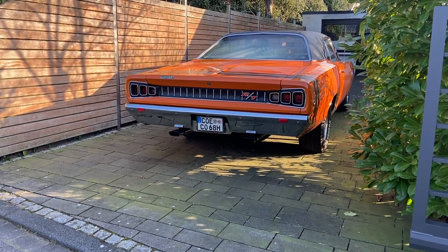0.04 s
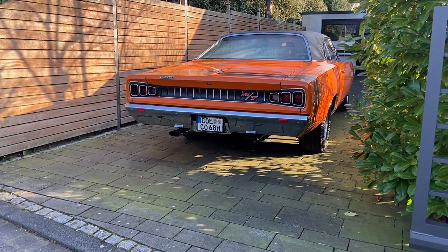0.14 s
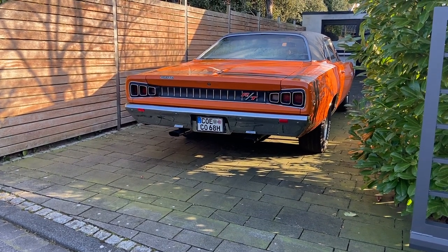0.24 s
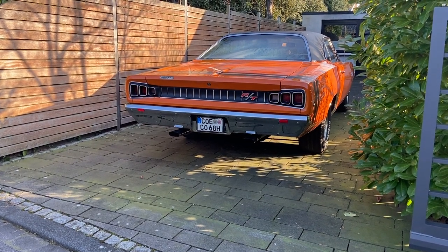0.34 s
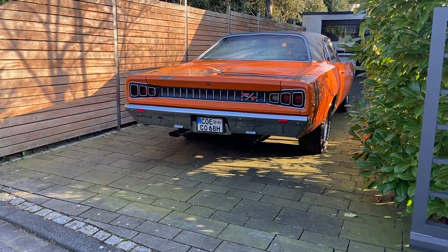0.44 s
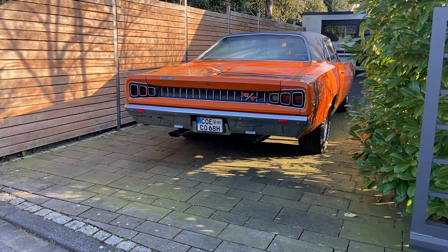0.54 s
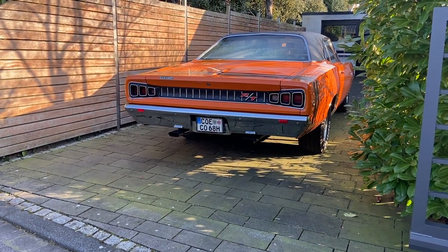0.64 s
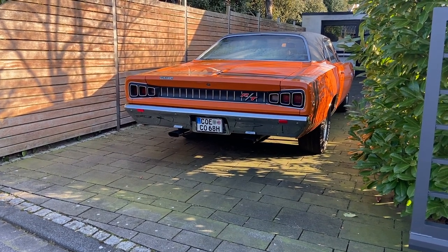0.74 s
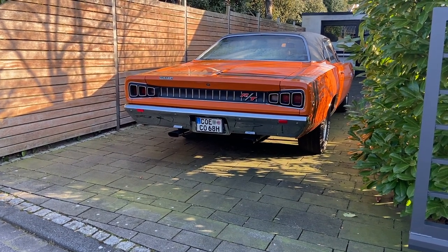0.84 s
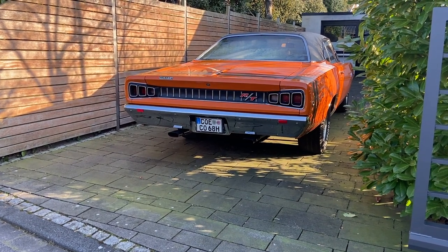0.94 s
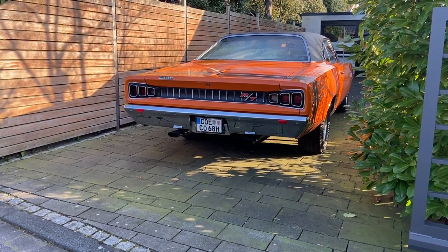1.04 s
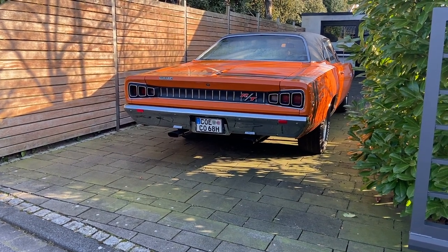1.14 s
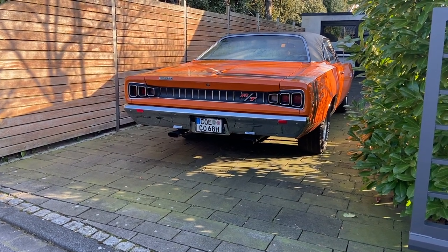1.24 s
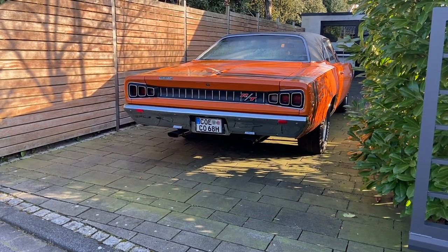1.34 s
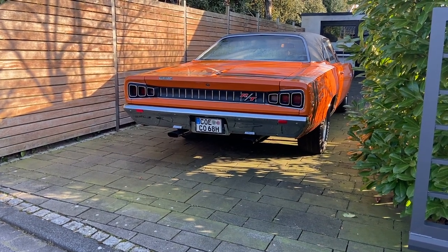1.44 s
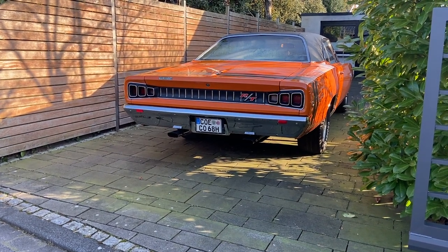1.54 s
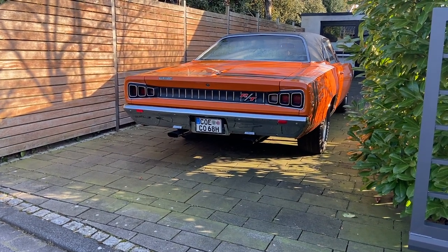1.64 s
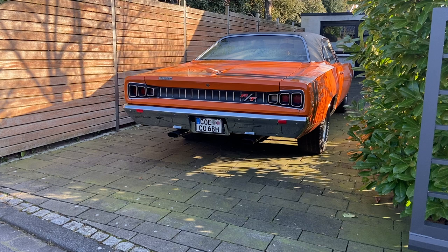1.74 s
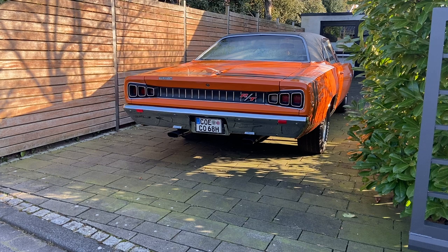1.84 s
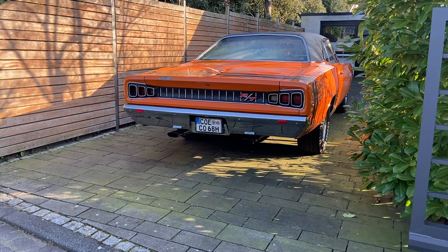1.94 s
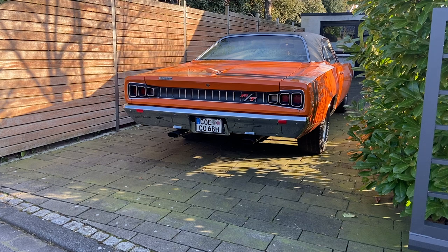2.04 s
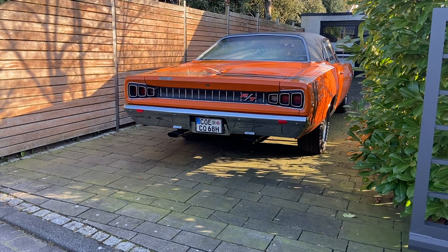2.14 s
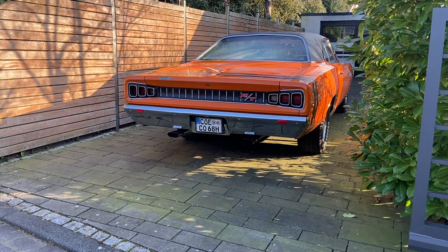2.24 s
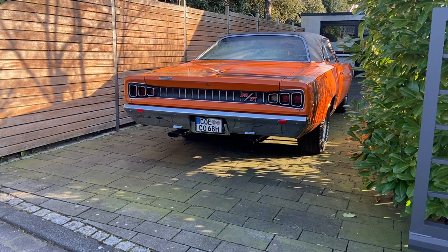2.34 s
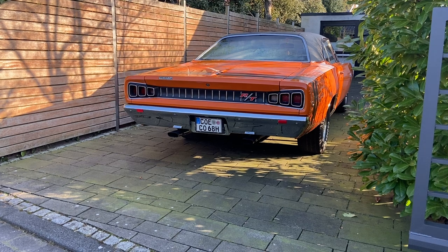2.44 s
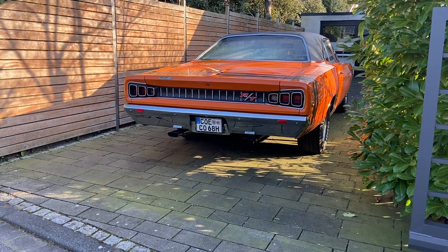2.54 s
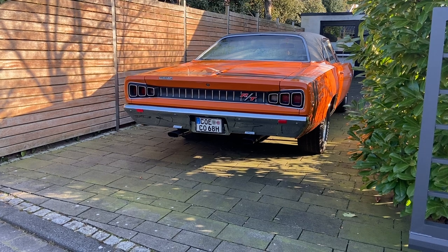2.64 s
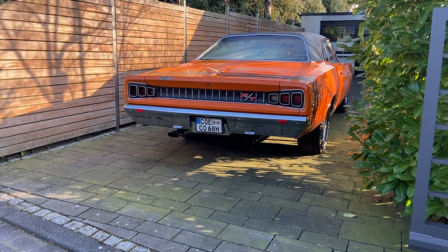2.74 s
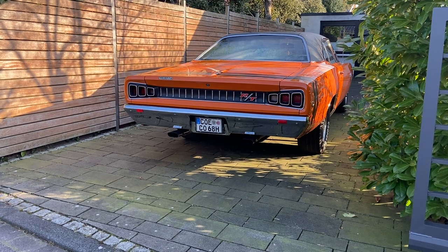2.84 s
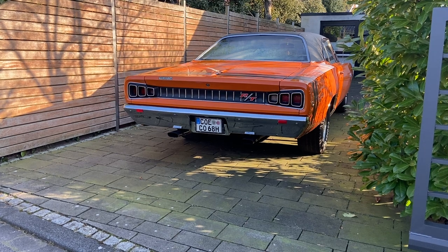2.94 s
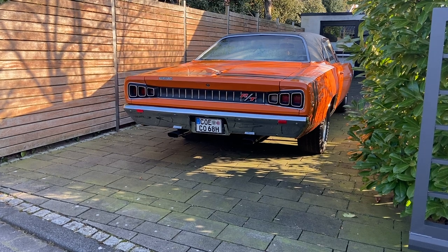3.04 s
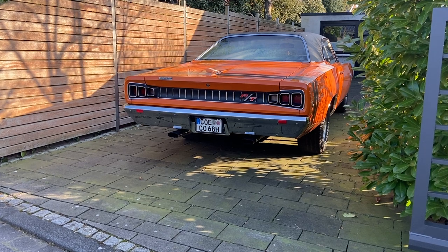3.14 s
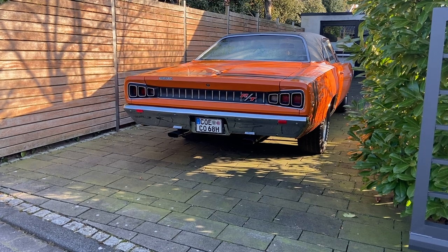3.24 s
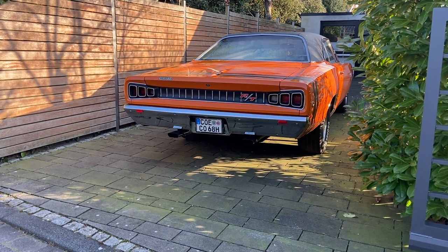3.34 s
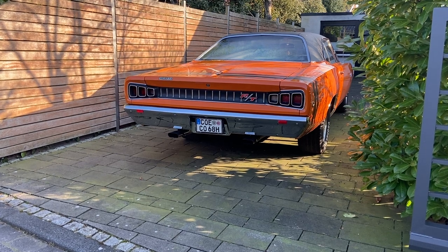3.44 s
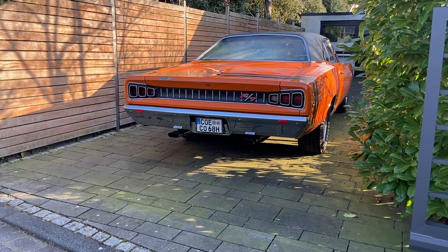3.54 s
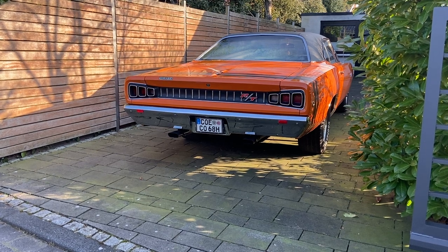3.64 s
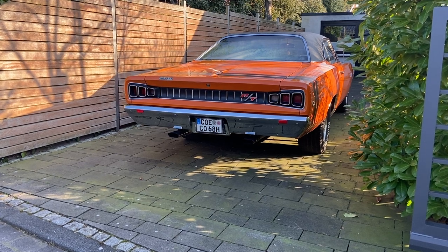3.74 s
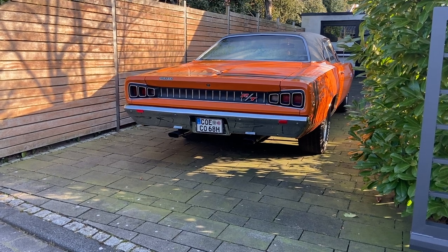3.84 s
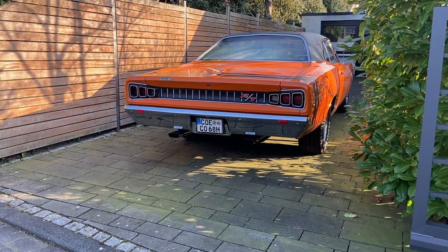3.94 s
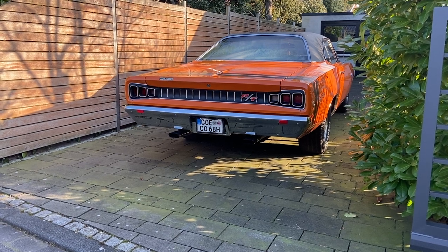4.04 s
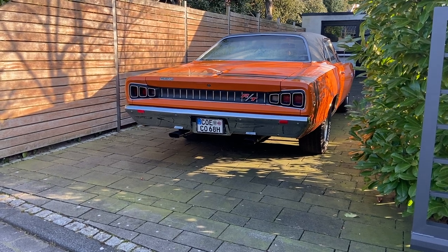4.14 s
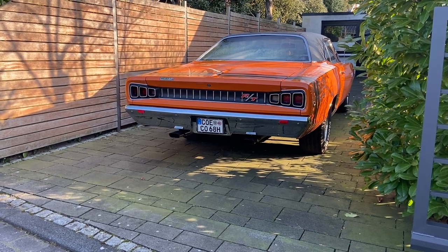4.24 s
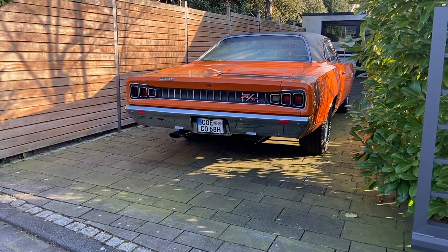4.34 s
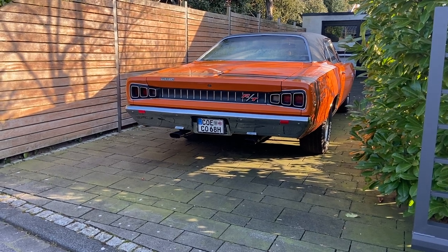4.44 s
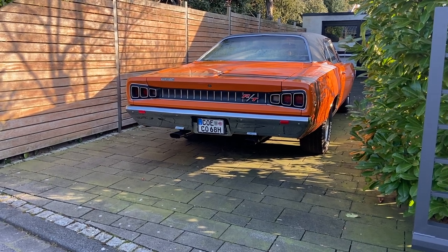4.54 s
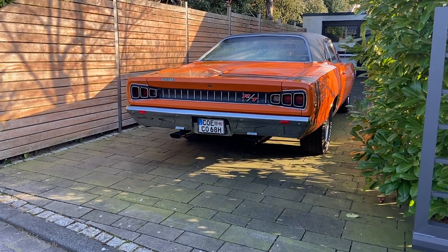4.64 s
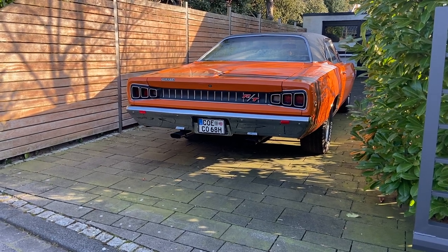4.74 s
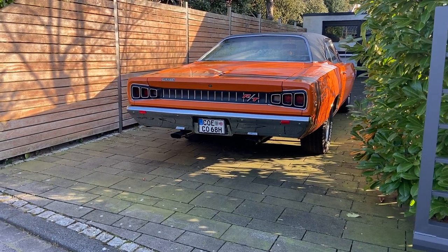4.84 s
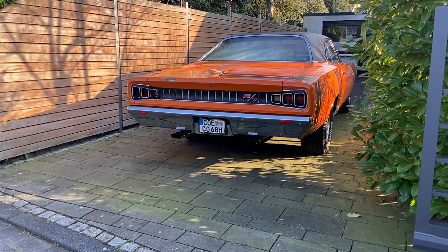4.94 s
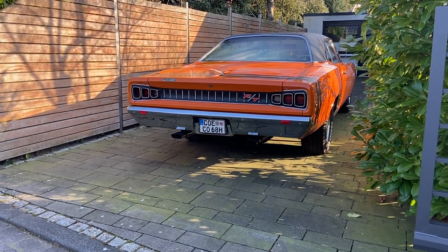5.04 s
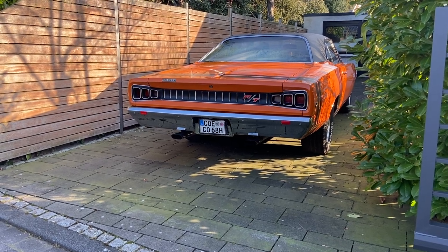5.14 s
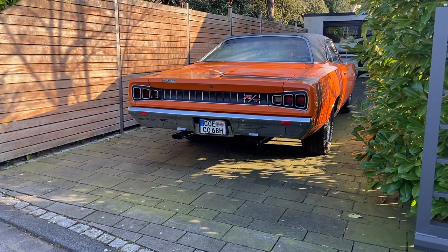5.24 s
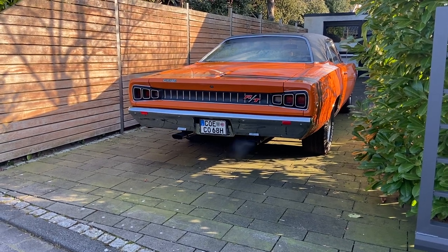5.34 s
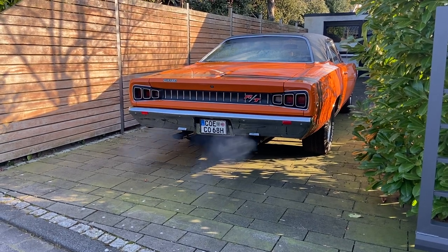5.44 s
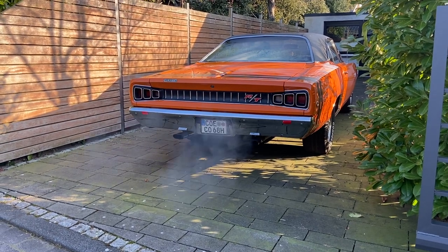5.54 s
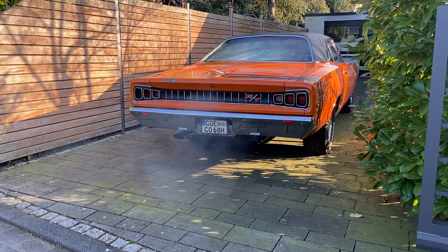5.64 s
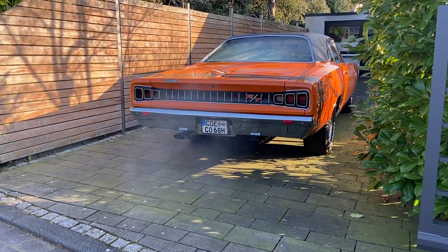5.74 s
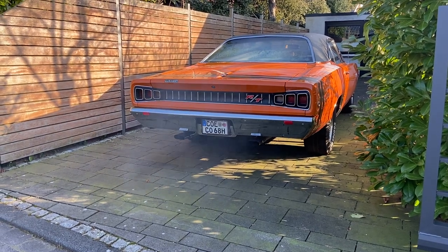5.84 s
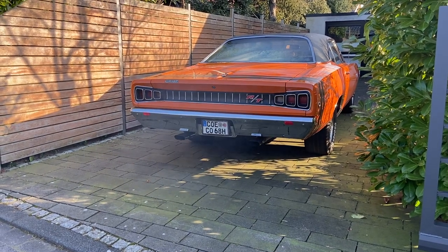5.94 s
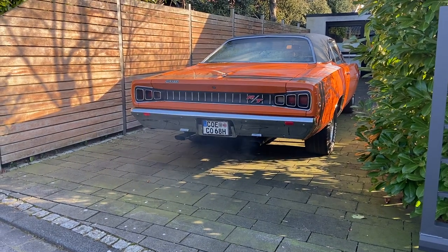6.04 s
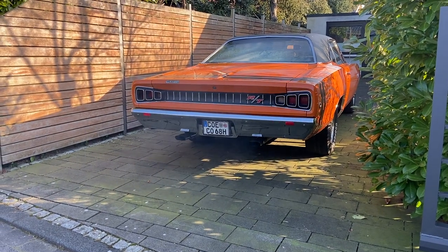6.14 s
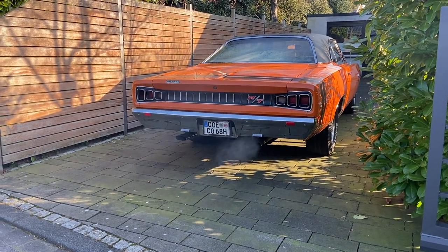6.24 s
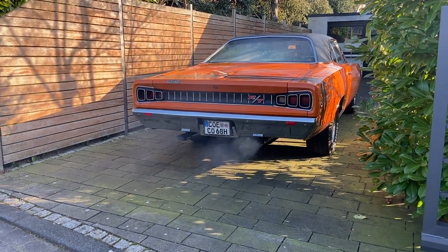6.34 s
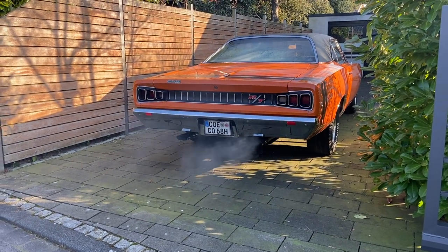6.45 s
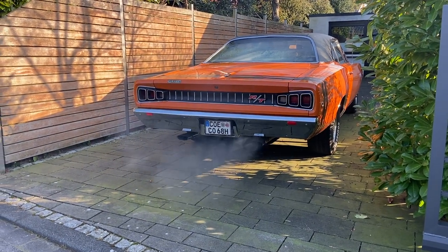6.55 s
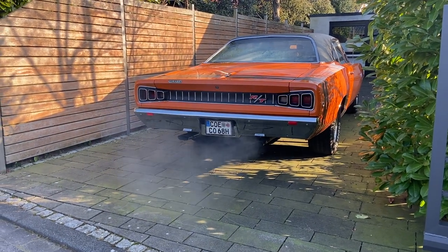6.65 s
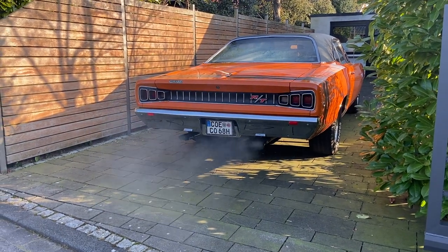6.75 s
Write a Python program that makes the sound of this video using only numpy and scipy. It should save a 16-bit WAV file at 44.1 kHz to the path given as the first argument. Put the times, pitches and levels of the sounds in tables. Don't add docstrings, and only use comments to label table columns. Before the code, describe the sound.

Outdoors, a big old car engine is cranked, left quiet amid birdsong and pedal clunks, then cranked again until it roars and settles unevenly.

```python
import sys
import numpy as np
from scipy import signal
from scipy.fft import rfft, irfft, next_fast_len
from scipy.io import wavfile
from scipy.ndimage import uniform_filter1d

SR = 44100
rng = np.random.default_rng(int(sys.argv[2]) if len(sys.argv) > 2 else 0)


def transcribe(signal):
    frames = np.atleast_2d(signal).T
    limited = np.clip(frames, -1, 1)
    pcm = np.round(limited * 32767).astype(np.int16)
    wavfile.write(sys.argv[1], SR, pcm)


def undo_db(level):
    steps = np.asarray(level, float) / 20
    return 10 ** steps


N = 298998
TIME = np.arange(N) / SR
PADDED = next_fast_len(N + SR // 2)
BIN_HZ = np.maximum(np.arange(PADDED // 2 + 1) * SR / PADDED, 1)


def rms_one(x):
    return x / np.sqrt(np.mean(x ** 2) + 1e-20)


def at_hz(points):
    hz, value = np.transpose(points)
    return np.interp(np.log(BIN_HZ), np.log(hz), value)


def colour(x, spectrum):
    return rms_one(irfft(rfft(x, PADDED) * undo_db(at_hz(spectrum)), PADDED)[:N])


def noise():
    return rng.standard_normal(N)


def drift(rate):
    steps = rng.standard_normal(3000)
    return np.interp(TIME * rate, np.arange(len(steps)), steps)


def band(x, low_hz, high_hz):
    sos = signal.butter(2, [low_hz, high_hz], "band", fs=SR, output="sos")
    return rms_one(signal.sosfilt(sos, x))


def resonate(x, modes):
    out = np.zeros(N)
    for k, (hz, width, db) in enumerate(modes):
        r = np.exp(-np.pi * width / SR)
        b = (1 - r * r) / 2 * np.array([1, 0, -1])
        a = [1, -2 * r * np.cos(2 * np.pi * hz / SR), r * r]
        out += (-1) ** k * undo_db(db) / np.sqrt(width) * signal.lfilter(b, a, x + 1e-18)
    return rms_one(out)


def pulses(rate_hz, jitter, spread_db):
    cycles = np.cumsum(rate_hz * (1 + jitter * drift(55))) / SR
    marks = np.diff(np.floor(cycles), prepend=0) > 0
    return marks * undo_db(spread_db * noise()), cycles


def hold(start, end, rise, fall):
    return np.clip(np.minimum((TIME - start) / rise, 1 - (TIME - end) / fall), 0, 1)


def bump(centre, half_width):
    return np.exp(-((TIME - centre) / half_width) ** 2)


def gate_after(clicks, decay_s):
    return rms_one(signal.lfilter([1], [1, -np.exp(-1 / (decay_s * SR))], clicks))


# frequency in Hz, density in dB per Hz.
TOWN = [(20, -36.5), (40, 1), (160, -10), (246, 2.5), (310, -16), (626, -15.5), (760, -23), (940, -15),
        (1200, -31), (3000, -38), (4300, -38.5), (6300, -48), (8000, -57.5), (10000, -65), (13000, -63.5)]
# start in seconds, end in seconds, level in dB.
ROCKING = [
    (1.393, 3.25, -44),
    (3.595, 4.596, -45),
]


def town_and_rocking():
    town = undo_db(-51 + 1.5 * drift(4.33)) * colour(noise(), TOWN)
    sway = sum(undo_db(db) * hold(start, end - .3, 0.17, 0.4) for start, end, db in ROCKING)
    return town + sway * undo_db(-5.5 + 3.3 * drift(37)) * band(noise(), 50, 194)


# start in seconds, end in seconds, start in Hz, end in Hz, level in dB.
NOTES = [(1.72, 1.784, 7100, 7100, -71), (1.763, 1.773, 4300, 4550, -65), (1.737, 1.79, 3900, 3450, -74),
         (1.81, 1.924, 8200, 8060, -64), (1.867, 2.05, 3040, 2940, -80.5), (1.974, 2.055, 8160, 7980, -66),
         (2.064, 2.09, 7500, 5030, -62), (2.085, 2.104, 7500, 5060, -64), (2.092, 2.144, 5090, 4950, -61.5),
         (2.187, 2.282, 4780, 4600, -61), (2.256, 2.27, 4270, 3720, -55), (2.277, 2.308, 3710, 3500, -54),
         (2.3, 2.393, 3485, 3500, -58), (2.378, 2.398, 2410, 2700, -71), (2.39, 2.453, 2670, 2680, -67.5),
         (2.69, 2.758, 6180, 6060, -73), (2.72, 2.776, 5270, 6300, -69), (2.756, 2.886, 6260, 8750, -69.5),
         (2.86, 2.922, 8240, 7880, -68), (2.779, 2.856, 4870, 6080, -65.5), (2.991, 3.03, 3840, 3850, -56),
         (3.018, 3.06, 3900, 4500, -62), (3.05, 3.113, 4510, 4430, -58), (3.237, 3.278, 4220, 4420, -67),
         (3.065, 3.217, 3960, 4140, -63), (3.262, 3.326, 2970, 3180, -73), (3.302, 3.36, 3300, 3400, -66),
         (3.369, 3.408, 3460, 3440, -56), (3.403, 3.432, 3660, 3950, -63.5),
         (3.483, 3.591, 4250, 4410, -61.5), (3.57, 3.602, 5160, 5150, -69.5),
         (3.609, 3.698, 4620, 4600, -67.5)]
# start in seconds, end in
# seconds, level in dB.
HAZE = [
    (1.867, 2.75, -68),
    (2.95, 3.2, -70),
]


def birds():
    shaken = hold(2.68, 2.93, 0.012, .01)
    warble = 1 + .007 * drift(260) + .035 * shaken * drift(400)
    song = np.zeros(N)
    for start, end, start_hz, end_hz, db in NOTES:
        place = np.clip((TIME - start) / (end - start), 0, 1)
        hz = (start_hz + (end_hz - start_hz) * place) * warble
        swell = np.sin(np.pi * place) ** 0.32
        song += undo_db(db + 4.5) * swell * np.sin(2 * np.pi * np.cumsum(hz) / SR)
    song *= 1 + .4 * drift(500)
    garden_t60_s = .45
    tail = rng.standard_normal(SR) * undo_db(-60 * TIME[:SR] / garden_t60_s)
    echo = signal.fftconvolve(song, tail / np.sqrt(np.sum(tail ** 2)))[:N]
    lingering = sum(undo_db(db) * hold(start, end, 0.31, 0.099) for start, end, db in HAZE)
    haze = lingering * band(band(noise(), 3550, 4000), 2750, 3930)
    return haze + song * undo_db(2.9 * drift(60)) + undo_db(-4) * echo


# time in seconds, peak in dB, pitch in Hz.
KNOCKS = [(1.203, -10, 110.2), (1.359, -28, 79.8), (1.467, -28, 56), (1.587, -22, 85), (1.948, -27, 80),
          (1.999, -34, 83.4), (2.099, -34, 80.7), (2.202, -31, 131), (2.25, -25, 96), (2.274, -30, 79.5),
          (2.335, -26.5, 91), (2.409, -32.5, 78), (2.8, -29, 54.4), (2.909, -30, 75.4), (2.935, -30.5, 171),
          (2.97, -28.5, 85), (3.065, -29.5, 74.6), (3.178, -30.5, 58), (3.949, -28.5, 131),
          (4.068, -30, 57), (4.259, -33.5, 78.1), (5.165, -18.5, 80.7), (5.2, -17, 90), (5.235, -29, 63),
          (5.263, -8, 111), (5.275, 2.5, 160), (0.794, -18, 63.4), (0.828, -20, 93.5), (0.99, -19, 79.5)]
# start in seconds, length in seconds, level in dB, brightness in dB.
SCUFFS = [(2.222, 0.12, -52, -8), (2.442, 0.13, -48, 2), (2.552, 0.082, -40, -10.5),
          (2.614, 0.062, -39.5, -15), (2.905, 0.1, -46, -13), (3.093, 0.11, -52.5, -3),
          (3.152, 0.11, -49.5, -11), (3.315, 0.06, -51, -31), (3.793, 0.12, -45, -9),
          (2.657, 0.075, -51, -13), (4.578, 0.055, -56, 32.5)]
# frequency in Hz, density in dB per Hz.
SCUFF_COLOUR = [(100, 13), (520, 1.5), (1260, -3.5), (1700, -11.5), (5400, -27), (8000, -69),
                (16000, -49.5)]
# time in seconds, peak in dB.
TICKS = [(2.259, -46), (2.363, -50), (2.501, -52), (2.513, -34), (2.569, -35), (2.583, -34), (2.597, -30),
         (2.634, -30), (2.66, -44), (2.937, -35), (3.332, -51), (3.348, -51)]
# frequency in Hz, width in Hz, level in dB.
LINK_BODY = [(333, 100, 2.5), (517, 170, -4), (1000, 130, -5), (1350, 330, -12), (2310, 650, -16)]


def linkage():
    knocks, dull, bright = np.zeros(N), np.zeros(N), np.zeros(N)
    for s, db, hz in KNOCKS:
        turns = np.clip(TIME - s + 0.0023, 0, None) * hz
        envelope = np.exp(-turns / 1.1) * np.minimum(turns / 0.8, 1)
        knocks += undo_db(db + 3) * np.sin(2 * np.pi * turns) * envelope
    for s, length, db, bright_db in SCUFFS:
        stroke = undo_db(db) * np.sin(np.pi * np.clip((TIME - s) / length, 0, 1)) ** 2
        dull += stroke
        bright += stroke * undo_db(bright_db - 11.0)
    grains = noise() * undo_db(1.8 * drift(300))
    creak = np.sin(np.pi * np.clip((TIME - 2.93) / 0.24, 0, 1))
    spring = undo_db(-60.5) * creak * band(grains, 1250, 1730)
    ticks = sum(undo_db(db) * (TIME > s) * np.exp(-np.clip(TIME - s, 0, None) / 0.0051) for s, db in TICKS)
    softened = signal.lfilter([.02], [1, -.98], ticks)
    body = undo_db(-4.5) * softened * band(resonate(noise(), LINK_BODY), 200, 2500)
    scrape = band(grains, 4700, 8500) + .45 * band(grains, 1200, 3000)
    return knocks + body + spring + dull * colour(grains, SCUFF_COLOUR) + bright * scrape


# time in seconds, strokes per second.
PUMP_PITCH = [(3.82, 67.6), (3.872, 66.7), (4.028, 68.6), (4.282, 68.6), (4.47, 66.3)]
# frequency in Hz, width in Hz, level in dB.
PUMP_BODY = [(239, 130, 0.5), (445, 39, 1.5), (496, 26, 1), (625.5, 23, 0), (798, 68, -6), (1193, 33, -1),
             (1515, 100, -12.5), (1750, 390, -20)]


def fuel_pump():
    on, off = 3.8, 4.43
    strokes, _ = pulses(np.interp(TIME, *np.transpose(PUMP_PITCH)), jitter=.0007, spread_db=.6)
    growth_db = 8 * hold(on, off, 0.42, 0.073)
    buzz = undo_db(-46 + growth_db) * hold(on, off, 0.093, 0.12)
    hiss = undo_db(-50.5) * hold(on, off, 0.0266, 0.053)
    gate = gate_after(strokes, 0.044)
    hiss_colour = [(1500, 12.0), (2500, -4.0), (4000, -8.0), (7000, -13.0), (16000, -5.0)]   # (Hz, dB per Hz)
    whirr = colour(noise() * (1 + 0.31 * gate), hiss_colour)
    roughness = .45 - .27 * hold(3.95, 4.4, .15, .08)
    push = rms_one(strokes) + roughness * noise() * (1 + .5 * gate)
    return buzz * resonate(push, PUMP_BODY) + hiss * whirr


# frequency in Hz, level in dB, 60 dB decay in seconds.
RING = [
    (1023, -39, 2.4),
    (1255, -58, 2.5),
    (665, -58, 1.5),
]


def ring_gear():
    age = np.clip(TIME - 1.3, 0, None)
    rise = np.minimum(age / 0.011, 1)
    return sum(undo_db(db - 60 * age / t60) * np.sin(2 * np.pi * hz * age) * rise for hz, db, t60 in RING)


# engage in seconds, release in seconds, exhaust puffs in dB.
CRANKS = [
    (-.4, 1.228, -32.5),
    (4.586, 5.25, -42),
]


def armature():
    coast_s = 0.58
    floor, rasp, puffs, coast = np.zeros((4, N))
    for on, off, puff_db in CRANKS:
        free, turning = hold(off, off + coast_s, 0.2, 0.022), hold(on, off, 0.0027, coast_s)
        speed = hold(on - .05, off + 0.28, 0.37, coast_s - .3)
        floor += undo_db(-26.5 - 17.5 * free) * speed * (turning > 0)
        rasp += undo_db(-33 - 47.5 * (TIME - off).clip(0)) * turning ** 0.61
        puffs += undo_db(puff_db) * hold(on, off + 0.2, 0.069, coast_s - .33)
        coast += undo_db(-39) * free * (turning + 0.007) ** 0.57
    return floor, rasp, puffs, coast


# time in seconds, peak in dB, decay in seconds.
STROKES = [(0.053, -12.5, 0.051), (0.169, -11, 0.03), (0.301, -15.5, 0.057), (0.426, -14, 0.05),
           (0.546, -15.5, 0.056), (0.676, -14, 0.051), (0.801, -15.5, 0.059), (0.932, -15.5, 0.051),
           (1.073, -19.5, 0.088), (1.19, -20, 0.54), (4.59, -20.5, 0.058), (4.772, -22, 0.052),
           (4.816, -23, 0.019), (4.996, -16.5, 0.042), (5.14, -15.5, 0.06)]
# time in seconds, tooth rate in Hz, level in dB.
SPIN_UP = [(4.63, 643.8, -31.5), (4.73, 655.8, -24.5), (4.77, 966.6, -27), (4.82, 996.6, -39),
           (4.86, 815, -32), (4.98, 1108, -53), (5.05, 847, -49), (5.135, 1230, -73), (5.25, 894, -61)]


def compression():
    full_hz, sag = 1230, .34
    load, tooth_hz, lull = np.zeros(N), np.full(N, full_hz * (1 - sag)), np.zeros(N)
    for s, db, decay in STROKES:
        age = np.clip(TIME - s + .003, 0, None)
        load += undo_db(db) * np.minimum(age / 0.018, 1) * np.exp(-age / decay - (age / 0.11) ** 4)
        slowing = np.sin(np.clip(age / 0.07, 0, 1) * np.pi / 2) ** 2
        tooth_hz = np.where(age > 0, full_hz * (1 - sag * slowing), tooth_hz)
        lull += bump(s - 0.026, 0.024)
    tooth_hz = np.where(TIME > 3, np.interp(TIME, *np.transpose(SPIN_UP)[:2]), tooth_hz)
    return load, tooth_hz, undo_db(-2 * lull)


# time in seconds, level in dB, half width in seconds.
SCREECHES = [
    (4.6, -45, 0.013),
    (4.795, -41, 0.022),
    (5.0, -42, 0.023),
    (5.15, -53.5, 0.027),
]


def screeches_and_cough(grit):
    screech = sum(undo_db(db) * bump(s, width) for s, db, width in SCREECHES)
    cough = undo_db(-19) * np.exp(-np.abs(TIME - 1.2) / 0.028 * 2)
    return screech * band(grit, 7400, 14000) + cough * band(grit, 55, 260)


# time in seconds, peak in dB.
GEAR_KNOCKS = [(0.054, -9), (0.1673, -8.5), (0.182, -13), (0.3008, -10), (0.314, -7), (0.427, -10.5),
               (0.4424, -10), (0.545, -12.5), (0.5594, -9), (0.6769, -9), (0.799, -9.5), (0.812, -8.5),
               (0.93, -9), (0.9434, -8), (0.996, -23), (1.074, -11.5), (1.086, -9.5), (1.1882, -8),
               (1.2015, -8.5)]
# time in seconds, peak in dB.
LATE_KNOCKS = [(4.78, -19), (4.814, -16.5), (4.973, -24), (4.984, -21), (4.996, -15), (5.14, -8)]
# frequency in Hz, width in Hz, level in dB.
HOUSING = [(638, 7.4, -9), (752.5, 5.6, -7), (799, 40, 0), (1004, 36, 0.5), (1089.4, 12, 0), (1152, 14, -2),
           (1221, 14, -3), (1352, 26, -2), (1418, 8.7, -2), (1520, 9, -6.5), (1969, 24, -6),
           (2310, 130, -6), (2653, 49, -5.5), (2894, 75, -3.5)]
# frequency in Hz, width in Hz, level in dB.
CASING = [(3360, 9.1, 1), (3900, 150, 11), (4430, 98, 0), (4900, 26, 5.5), (5820, 30, -8), (6420, 130, 6.5)]
# frequency in Hz, density in dB per Hz.
RASP = [(200, -7), (570, -5.5), (1200, -6.5), (1700, -5), (2900, -14), (3400, -17), (4300, -16),
        (6650, -19.5), (9000, -24.5), (12000, -24.5), (16000, -36.5)]
# frequency in Hz, density in dB per Hz.
COAST_COLOUR = [(200, -15), (390, 5), (600, -2.5), (900, -5.5), (1500, -8.5), (2500, -46), (4000, -20.5),
                (5000, -28), (16000, -43)]


def starter():
    load, tooth_hz, lull = compression()
    knock = sum(undo_db(db - 6) * bump(s + 0.0027, 0.0024) for s, db in GEAR_KNOCKS + LATE_KNOCKS)
    teeth, cycles = pulses(tooth_hz, jitter=.025, spread_db=3.)
    strikes = teeth - teeth.mean()
    whine = resonate(rms_one(strikes) + .35 * noise(), HOUSING)
    rattle = resonate(noise(), HOUSING)
    tone = resonate(strikes, HOUSING) * undo_db(3 * drift(70))
    floor, rasp, puffs, coast = armature()
    floor, rasp = floor * lull, rasp * np.sqrt(lull)
    load *= undo_db(2.5 * drift(160))
    s, _, sing_db = np.transpose(SPIN_UP)
    singing = undo_db(np.interp(TIME, s, sing_db, left=-150, right=-150))
    gear = undo_db(-11) * load * (1.18 * whine + 1.23 * rattle)
    gear += undo_db(-3.5) * floor * rattle + singing * tone
    gear += coast * undo_db(0.78 * drift(31.3)) * colour(noise(), COAST_COLOUR)
    gear += undo_db(3.5) * knock * np.sin(2 * np.pi * cycles)
    grit = noise() * undo_db(3.3 * noise())
    beat = 0.72 + 4.4 * load + 4.8 * knock
    covers = undo_db(-9.5) * resonate(grit * undo_db(1.75 * drift(60)), CASING)
    gear += undo_db(2.0) * rasp * beat * (colour(grit, RASP) + covers)
    exhaust = undo_db(0.5) * puffs * band(noise(), 35, 108.0) * undo_db(1.5 * drift(13))
    return gear + screeches_and_cough(grit) + exhaust


# peak in seconds, level in dB, rise in seconds, fall in dB per second.
SURGES = [
    (5.275, -20.5, 0.051, 39),
    (5.41, -17, .006, 41),
    (5.69, -30, 0.091, 16),
    (6.245, -42.5, 0.014, 51),
    (6.308, -29.5, 0.088, 167.5),
    (6.458, -27, 0.091, 8),
]


def gas_flow():
    surges = []
    for s, db, rise, fall in SURGES:
        surges.append(db - np.where(TIME < s, 20 * (s - TIME) / rise, fall * (TIME - s)))
    return np.max(surges, axis=0)


# time in seconds, rasp lift in dB, bark lift in dB, rise in seconds.
BANGS = [(5.255, 10, 5.5, 0.00069), (5.27, 6, 3, 0.0033), (5.295, 10, 9, 0.0092), (5.322, 5.5, 1.5, .005),
         (5.346, 4, 9, 0.0019), (5.398, 6, 10, 0.00084), (5.434, 2.5, 2.5, 0.0079),
         (5.496, -0.5, 8, 0.0091), (5.527, 4, 6, 0.002), (5.543, -0.5, 4, .004), (5.578, -2, 5.5, 0.003),
         (5.663, 1, -3.5, 0.0045), (5.711, 2, 2.5, .005), (5.794, 4.5, -1.5, 0.0036), (5.852, 3, 0, 0.0056),
         (5.926, 2, -3, 0.0055), (6.003, 4, 7, 0.0039), (6.077, 1.5, 2, 0.0047), (6.163, 3.5, 9, 0.005),
         (6.24, 8.5, -3.5, 0.0069), (6.267, 2, 2, 0.00503), (6.293, 6.5, 6, 0.004), (6.311, 4, 5.5, 0.004),
         (6.345, 4, 4, 0.006), (6.398, 7.5, 5.5, .003), (6.432, 3, 4, 0.0068), (6.472, 3, 0.5, 0.0062),
         (6.541, 2.5, 6.5, 0.0054), (6.573, 7, 0.5, 0.0053), (6.644, -1.5, 6, 0.0048),
         (6.67, 2.5, -1, 0.0051), (6.741, 3, -5, 0.0075)]
# time in seconds, level in dB, half
# width in seconds.
WAVERS = [(5.383, 1.5, 0.012), (5.562, -0.5, 0.01), (6.215, -4, 0.029), (6.385, 4, 0.012),
          (6.636, -3.5, 0.011)]


def bangs(column):
    lift = sum(db * bump(s, width) for s, db, width in WAVERS) - 3.0
    for row in BANGS:
        rise = row[3]
        age = np.clip(TIME - row[0], 0, None)
        lift += row[column] * np.minimum(age / rise, 1) * np.exp(-np.clip(age - rise, 0, None) / 0.025)
    return lift


def pipe_mode(throbs, dip_db):
    start, peak_db, hz = np.transpose(throbs)
    end = np.append(start[1:], N / SR + 0.0059)
    k = np.clip(np.searchsorted(start, TIME) - 1, 0, None)
    place = np.clip((TIME - start[k]) / (end - start)[k], 0, 1)
    dips = undo_db(peak_db + dip_db)
    base = dips[k] + (np.append(dips[1:], dips[-1])[k] - dips[k]) * place
    swell = np.sin(np.pi * place ** .8) ** .65
    level = base + np.maximum(undo_db(peak_db + .8)[k] - base, 0) * swell
    pitch = np.interp(TIME, (start + end) / 2, hz) * (1 + .02 * drift(45))
    onset = np.minimum((TIME - start[0]).clip(0) / 0.0057, 1)
    return level * onset * np.sin(2 * np.pi * np.cumsum(pitch) / SR)


# start in seconds, peak in dB, pitch in Hz.
PIPE_LOW = [(5.254, -8, 77.15), (5.282, -6, 59.9), (5.3, -4.5, 94.2), (5.342, -11, 131.6),
            (5.362, -23, 75.1), (5.378, -9, 86.8), (5.4, -7.5, 121.7), (5.424, -9, 100.6),
            (5.458, -14, 106), (5.492, -12, 118.2), (5.525, -26.5, 90), (5.556, -13, 112.9),
            (5.585, -10.5, 92.6), (5.635, -17, 101.7), (5.681, -13, 109.1), (5.76, -7.5, 100.1),
            (5.822, -7.5, 95.87), (5.953, -8, 94.4), (5.978, -7, 97.14), (6.034, -5.5, 98.3),
            (6.066, -11.5, 92.3), (6.105, -6.5, 96.8), (6.142, -8.5, 99), (6.24, -4.5, 98.1),
            (6.361, -8.5, 97.97), (6.402, -3, 106.8), (6.439, -17, 93.2), (6.487, -6, 94.9),
            (6.54, -8, 97.7), (6.609, -7, 105.2), (6.66, -5, 100.7), (6.715, -9.5, 106.7)]
# start in seconds, peak in dB, pitch in Hz.
PIPE_HIGH = [(5.262, -8.5, 168.6), (5.31, -16, 175.3), (5.349, -19, 169.8), (5.382, -11, 156.5),
             (5.403, -15.5, 212.7), (5.44, -11.5, 177.8), (5.478, -8.5, 198.2), (5.572, -16.5, 196.2),
             (5.635, -9, 191.4), (5.68, -11, 184.8), (5.73, -16.5, 183.3), (5.81, -25, 171.7),
             (5.875, -21, 193.4), (5.937, -16.5, 180.4), (6.006, -24, 187.4), (6.143, -21, 185.7),
             (6.244, -12.5, 186.3), (6.29, -15, 176.3), (6.348, -19, 192.6), (6.405, -14, 196.1),
             (6.424, -12.5, 190.4), (6.481, -8.5, 181.9), (6.525, -9, 181.5), (6.568, -17, 169),
             (6.604, -13.5, 187.6), (6.647, -13, 191.7), (6.685, -11.5, 182.2), (6.725, -14.5, 173.6)]
# start in seconds, peak in dB, pitch in Hz.
PIPE_THIRD = [(5.253, -12.5, 242), (5.393, -9, 281.4), (5.439, -8, 279.2), (5.55, -15.5, 291.8),
              (5.615, -20, 303), (5.67, -28, 272.6), (5.711, -35, 287.4), (5.809, -21, 277.2),
              (5.871, -32, 242), (5.921, -20, 243.4), (5.951, -26, 240.6), (5.98, -19, 255),
              (6.041, -25, 281.3), (6.092, -40, 301.8), (6.132, -44, 267.6), (6.193, -47, 313.4),
              (6.242, -21.5, 295), (6.295, -15.5, 267), (6.345, -21, 287.7), (6.399, -35, 277.4),
              (6.441, -14, 267.5), (6.505, -20, 254.7), (6.577, -14.5, 279.5), (6.625, -15, 262),
              (6.653, -38, 238.1), (6.68, -20, 245.7), (6.722, -17.5, 281)]
# time in seconds, firings per second.
FIRING = [(5.25, 55), (5.36, 65.4), (5.52, 111), (5.7, 83.6), (5.95, 75.7), (6.25, 88), (6.45, 95.5),
          (6.78, 76)]
CYLINDER_DB = [8.5, -8, 5, 5, -15, 1, -1, -8]
# frequency in Hz, width in Hz, level in dB.
MUFFLER = [(211.3, 18, 0.5), (311, 30, -1.5), (364, 32, -1), (497.5, 31, -6.5), (558.6, 12, -4),
           (693, 66, -6), (809, 25, -11), (956, 14, -13)]
# frequency in Hz, width in Hz, level in dB.
TAILPIPE = [(1112, 104, 0), (1452, 180, 5.5), (1684, 275, 5)]
# frequency in Hz, width in Hz, level in dB.
TIPS = [(2503, 42, -8), (3055, 120, -1), (3577, 48, -3.5), (3930, 150, 0), (4710, 110, 3.5),
        (5490, 110, -2), (6430, 150, -18)]
# frequency in Hz, density in dB per Hz.
JET = [(1500, -8), (2270, -7), (3000, -4), (3500, -8), (4000, -3.5), (4700, -3), (5300, -6.5), (6300, -4),
       (8500, -10.5), (12000, -12), (16000, -18.5)]


def engine():
    flow, catch_s = gas_flow(), PIPE_LOW[0][0]
    running = TIME > catch_s - .012
    bark = undo_db(-28.5 + 0.79 * (flow + 31)) * running
    rasp = undo_db(-29 + 0.71 * (flow + 29.5)) * running
    hiss = undo_db(flow) * running
    lift_db, bark_db = bangs(column=1), bangs(column=2)
    fire, cycles = pulses(np.interp(TIME, *np.transpose(FIRING)), jitter=.03, spread_db=1.2)
    fire = fire * undo_db(np.array(CYLINDER_DB)[cycles.astype(int) % len(CYLINDER_DB)])
    gate = gate_after(fire, 0.017)
    puff = .7 * rms_one(fire) + .25 * noise() * gate + .8 * noise()
    out = bark * undo_db(bark_db + 2) * resonate(puff, MUFFLER)
    out += rasp * undo_db(lift_db) * resonate(noise() * (1.2 + gate) + .2 * rms_one(fire), TAILPIPE)
    jet = colour(noise() * undo_db(3.0 * noise()) * (2.5 + gate), JET)
    out += hiss * undo_db(lift_db - 2) * jet * undo_db(drift(30))
    out += hiss * undo_db(lift_db - 6.5 + 3.3 * drift(25)) * resonate(noise() * (4.3 + gate), TIPS)
    out += bark * undo_db(-9.5 + 2.1 * bark_db) * band(noise(), 580, 1090)
    out += undo_db(-6.0) * pipe_mode(PIPE_THIRD, dip_db=-25)
    pipes = pipe_mode(PIPE_LOW, dip_db=-25) + pipe_mode(PIPE_HIGH, dip_db=-27)
    swell = np.sqrt(uniform_filter1d(pipes ** 2, size=4000))
    thud = undo_db(-12.5) * band(puff, 55, 150)
    return out + pipes + swell * (TIME > catch_s) * thud


def scene():
    mono = town_and_rocking() + birds() + linkage() + fuel_pump() + ring_gear() + starter() + engine()
    return np.array([mono, mono])


def top_cut(x):
    return signal.sosfilt(signal.butter(12, 15920, fs=SR, output="sos"), x)


# frequency in Hz, scattered over direct sound in dB.
SCATTER = [(30, -22.5), (60, -36), (150, -25), (300, -18.5), (500, -14), (1000, -11), (2000, -5),
           (4000, -5), (7000, -6.5), (12000, -34.5)]
# frequency in Hz, left over right in dB.
PORT_BALANCE = [(1800, -.5), (2700, .5), (5000, 4.5), (7000, 3.5), (9000, 0)]


def record(dry):
    length = SR // 4
    tail = rng.standard_normal(length) * undo_db(-60 * TIME[:length] / .25)
    scatter = undo_db(at_hz(SCATTER)) * rfft(tail / np.sqrt(np.sum(tail ** 2)), PADDED)
    turns = np.clip(BIN_HZ - 7050, 0, None) / 4240
    half = undo_db(at_hz(PORT_BALANCE) / 2) * np.exp(-1j * np.pi * turns)
    ports = np.array([(1 + scatter) * half, (1 - scatter) / half]) * (BIN_HZ < 15900)
    ports *= BIN_HZ ** 2 / (BIN_HZ ** 2 + 30 ** 2)
    x = irfft(rfft(dry, PADDED) * ports, PADDED)[:, :N]
    rounded = 1.05 * np.tanh(x / 1.05)
    return top_cut(rounded)


dry = scene()
out = record(dry)
transcribe(out)
```